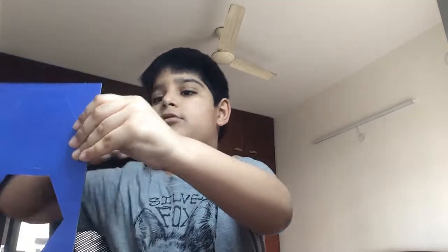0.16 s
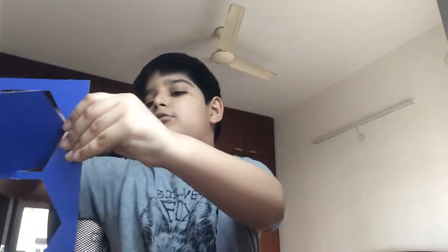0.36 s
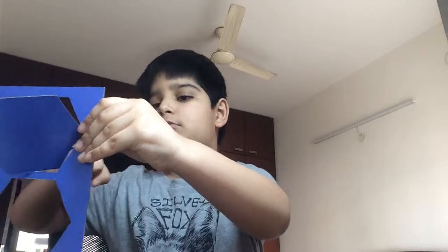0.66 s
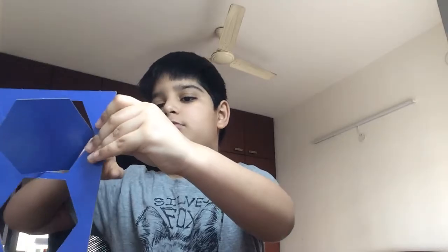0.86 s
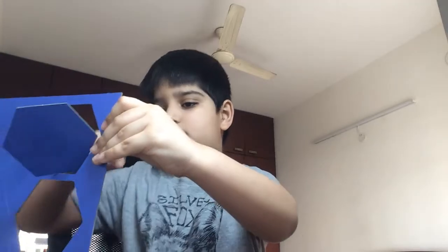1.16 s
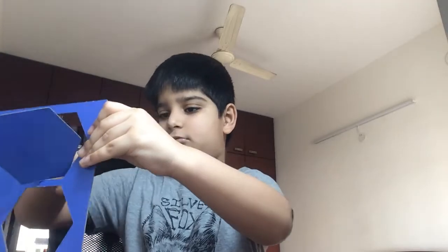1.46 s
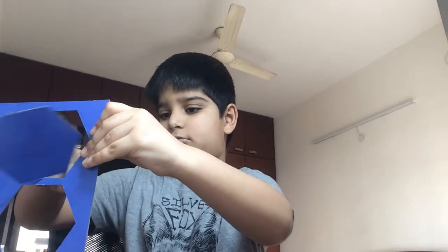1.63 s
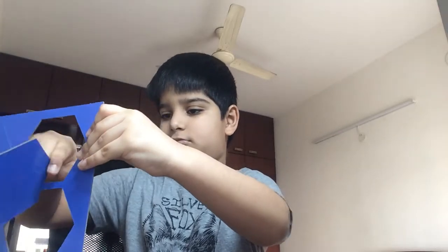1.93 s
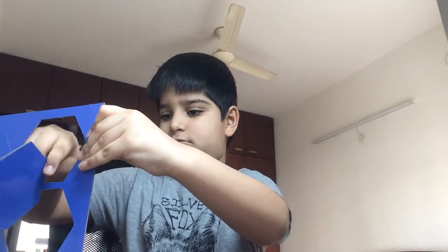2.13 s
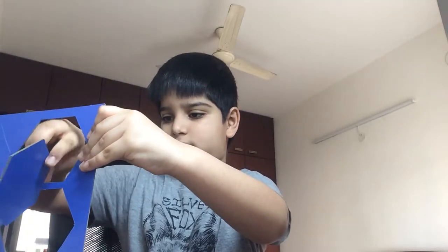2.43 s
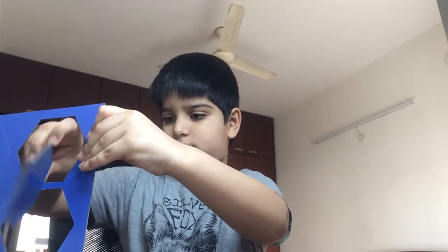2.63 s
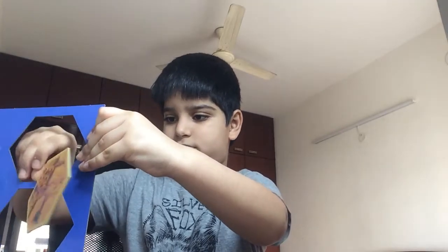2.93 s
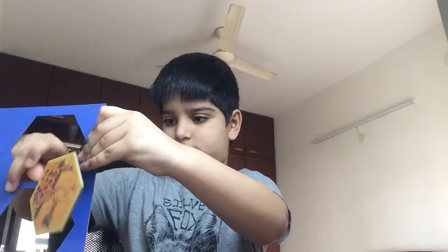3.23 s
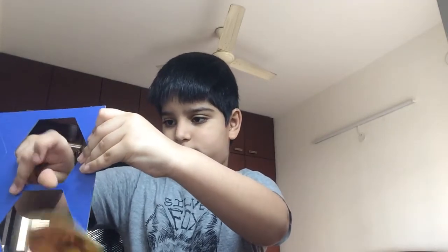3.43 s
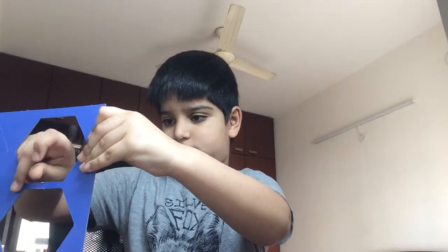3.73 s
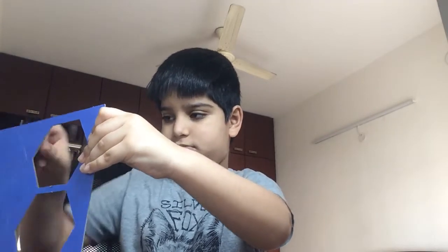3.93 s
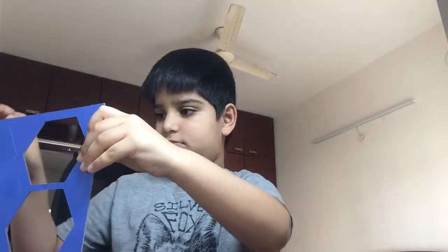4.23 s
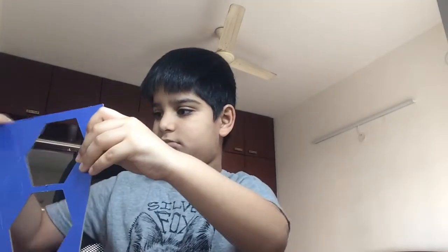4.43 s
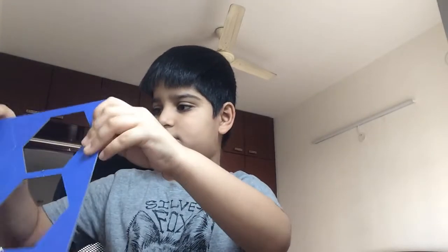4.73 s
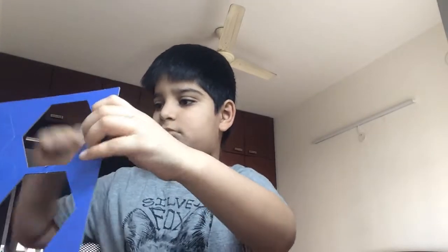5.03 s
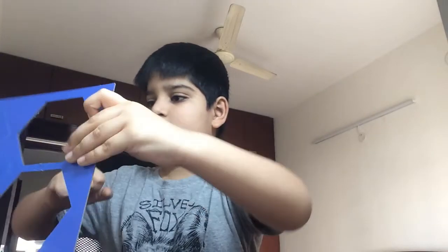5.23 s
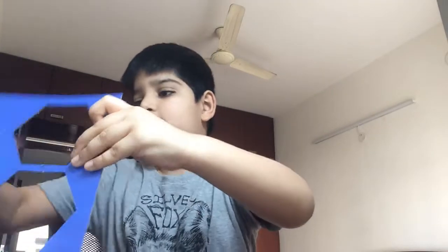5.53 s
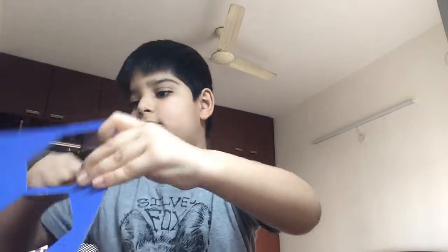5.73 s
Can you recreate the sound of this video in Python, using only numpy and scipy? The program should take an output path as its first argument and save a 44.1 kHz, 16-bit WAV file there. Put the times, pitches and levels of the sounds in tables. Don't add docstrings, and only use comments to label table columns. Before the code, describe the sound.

Irregular bursts of snapping, tearing cardboard with dull thunks and quiet handling between them, over faint low street rumble indoors.

```python
import sys
import numpy as np
from scipy import signal
from scipy.fft import rfft, irfft, next_fast_len
from scipy.io import wavfile
from scipy.ndimage import map_coordinates

SR = 44100
rng = np.random.default_rng(int(sys.argv[2]) if len(sys.argv) > 2 else 0)


def to_wav(s):
    ch = np.atleast_2d(s).T
    pcm = np.round(np.clip(ch, -1, 1) * 32767)
    wavfile.write(sys.argv[1], SR, pcm.astype(np.int16))


def voltage_ratio(level):
    return 10 ** (np.asarray(level, float) / 20)


N = 258867

# start in seconds, crackle peak in dB, sharp edge in dB relative
# to it, tap peak in dB, tap frequency in Hz.
GRIP_SHIFTS = [(0.8215, -53, -30, -63, 258), (0.8845, -54.5, -19, -48.5, 259), (1.0029, -64, -12, -49, 255),
               (1.6887, -59, -17, -64, 300), (1.8494, -59, -6, -67, 300), (2.0194, -66, -12, -62, 242),
               (2.077, -63, -24, -36, 340), (2.142, -62, -25, -50, 314), (2.2969, -59, -21, -47, 400),
               (2.5034, -56.5, -20, -55.5, 440), (2.8085, -60.5, -23, -50.5, 418),
               (2.8918, -47, -28, -48, 500), (2.9991, -59, -15, -62, 332), (3.988, -50, -10, -55, 240),
               (4.032, -65, -10, -39, 380), (4.2367, -57, -12, -34.5, 350), (4.4823, -65, -11, -44, 303),
               (4.585, -54, -9, -46.5, 324), (4.6239, -60, -17, -66, 330), (4.8623, -58.5, -7, -51, 526),
               (5.1944, -49.5, -13, -47, 549), (5.2354, -56, -7, -51, 244)]
# frequency in Hz, level in dB per Hz.
RUMBLE_SPECTRUM = [(15, -59), (25, -45), (47, -4.5), (97, -2.5), (150, -4.5), (171, -9), (194, -1),
                   (260, -13), (340, -54.5), (570, -120)]
# frequency in Hz, level in dB per Hz.
TRAFFIC_SPECTRUM = [(140, -14.5), (240, -7.5), (339, -3.5), (529, -7.5), (764, -10.5), (954, -21),
                    (1500, -33.5), (1950, -21.5), (3300, -120)]


def snaps():
    # start in seconds, crackle peak in dB, bend and sharp edge in dB relative
    # to it, decay time T60 in seconds.
    tabs = [(0.386, -23, 2.5, -7.5, 0.1), (0.3945, -24, -14, -10, 0.099), (0.4358, -28, 2.5, -25, 0.06),
            (0.508, -31, 2, -16, 0.048), (1.095, -39, 4, -10.5, 0.15), (1.1561, -50, -7, -19, 0.073),
            (1.558, -47, 2, -8.5, 0.11), (1.5831, -43.5, 6, -20, 0.053), (3.4418, -24, -7, -14.5, 0.039),
            (3.479, -31, -3, -14, 0.066), (3.5482, -22, 0, -24, 0.056), (3.6547, -16.5, -9, -17, 0.084),
            (3.7116, -19.5, -14, -13, 0.058), (3.7421, -27.5, -6, -20, 0.035),
            (3.7794, -24, -12, -11, 0.092), (3.8294, -40, -2, -15, 0.06), (4.2215, -45, 1, -4.5, 0.035),
            (4.3312, -42.5, -1, -25, 0.051), (5.6005, -21, -5, -12.5, 0.073), (5.6699, -47, -10, -4, 0.045),
            (5.6985, -27.5, -6, -9, 0.078), (5.8387, -30, -12, -14, 0.078)]
    # frequency in Hz, width in Hz, level in dB.
    board_modes = [(640, 160, -0.5), (837, 145, 3.5), (1032, 175, 0.5), (1245, 172, 2.5), (1670, 270, -4.5)]
    # frequency in Hz, width in Hz, level in
    # dB.
    upper_board_modes = [(1900, 470, 3.2), (2320, 300, 3), (2690, 280, 3), (3245, 320, 0), (3740, 300, 0),
                         (4400, 700, -3.5)]
    # frequency in Hz, level in dB per Hz.
    edge_spectrum = [(2650, -34.5), (4500, 0.5), (4940, 0.5), (5720, -1), (9000, -14.5), (11700, -42.5),
                     (19800, -120)]
    # frequency in Hz, level in dB per Hz.
    air_spectrum = [(6000, -27.5), (9000, 1.5), (12000, -5.5), (15500, -13)]

    tears = []
    for s, db, bend_db, edge_db, t60 in tabs:
        air_db = -12 + 0.75 * bend_db + edge_db
        tears.append((s, db, bend_db, edge_db, air_db, t60))
    for s, db, edge_db, tap_db, _ in GRIP_SHIFTS:
        bend_db = -0.3 + 0.25 * (tap_db - db)
        tears.append((s, db, bend_db, edge_db, -25, 0.06))

    body, edge, air = np.zeros((3, N))
    t = np.arange(8192) / SR
    clumps = np.pad(voltage_ratio(0.99 * wobble(500)), (0, len(t)), "edge")
    for s, db, bend_db, edge_db, air_db, t60 in tears:
        decay = voltage_ratio(-60 * t / max(t60, 0.01)) + 0.34 * voltage_ratio(-60 * t / 0.0048)
        burst = voltage_ratio(db) * decay * (1 - np.exp(-t / 0.0006))
        spikes = burst * rng.standard_normal((3, len(t))) * voltage_ratio(2.85 * rng.standard_normal(len(t)))
        spikes[1:] *= clumps[round(s * SR):][:len(t)]
        grip = 1 + 0.025 * rng.standard_normal(2)
        add(body, s, voltage_ratio(bend_db + 9.2) * resonant(spikes[0], board_modes, grip[0])
            + voltage_ratio(1.5) * resonant(spikes[1], upper_board_modes, grip[1]))
        add(edge, s, voltage_ratio(edge_db + 5.5) * spikes[2])
        add(air, s, voltage_ratio(air_db + 4.0) * spikes[2])
    edge = filtered(edge, lambda hz: voltage_ratio(along(edge_spectrum, hz)))
    air = filtered(air, lambda hz: voltage_ratio(along(air_spectrum, hz)))
    return body + edge + air


def knocks():
    # start in seconds, peak in dB, frequency in Hz, decay time T60 in seconds.
    tile_knocks = [(0.384, -8.5, 375, 0.029), (0.396, -33, 433, 0.022), (0.444, -31.5, 407, 0.05),
                   (0.504, -33.5, 515, 0.028), (1.096, -31, 300, 0.08), (1.108, -22.5, 277, 0.027),
                   (1.158, -30, 260, 0.049), (1.558, -48.5, 302, 0.066), (1.582, -38, 595, 0.06),
                   (3.442, -37.5, 510, 0.11), (3.479, -30.5, 328, 0.087), (3.55, -16, 410.4, 0.062),
                   (3.564, -19, 393, 0.02), (3.658, -25.5, 474, 0.046), (3.712, -29, 636, 0.086),
                   (3.787, -27.5, 228, 0.08), (3.83, -35, 407, 0.04), (4.042, -35, 238, 0.035),
                   (5.5988, -13.5, 358, 0.045), (5.6995, -24, 401.6, 0.085), (5.84, -33, 492, 0.029)]
    # start in seconds, peak in dB, frequency in Hz, T60 in seconds.
    frame_slaps = [
        (0.437, -29.5, 773, 0.079),
        (0.506, -31.5, 542, 0.038),
        (1.102, -28.5, 654, 0.018),
        (1.124, -32, 640, 0.039),
        (1.583, -37.5, 569, 0.058),
        (3.55, -18.5, 1028, 0.045),
        (3.574, -23.5, 613, 0.052),
        (3.667, -21, 1085, 0.074),
        (4.221, -44.5, 1236, 0.04),
        (5.6006, -28, 1270, 0.026),
    ]
    taps = [(s - 0.001, db, hz, 0.058) for s, _, _, db, hz in GRIP_SHIFTS]
    wide_modes, close_modes = [1.42, 0.72, 1.9], [1.17, 0.8, 0.62]
    out, t = np.zeros(N), np.arange(SR // 4) / SR
    for table, spread in (tile_knocks + taps, wide_modes), (frame_slaps, close_modes):
        for s, db, hz, t60 in table:
            ratios = np.r_[1, spread * (1 + 0.07 * rng.standard_normal(3))]
            since = t - 1 / hz - 0.002
            wander = np.cumsum(rng.standard_normal((4, len(t))), axis=1) * 0.035 * (since > 0)
            swing = np.cos(2 * np.pi * hz * ratios[:, None] * since + wander)
            ring = -voltage_ratio([3.5, -7.5, -3.0, -8.5]) @ swing
            shape_db = np.where(since < 0, since * hz * 9, -60 * since / np.clip(t60, 0.02, 0.085))
            add(out, s - 0.0008, voltage_ratio(db - 6 + shape_db) * np.minimum(t / 0.0032, 1) * ring)
    return filtered(out, lambda hz: 1 / (1 + 1j * hz / 5500) ** 2)


def pings():
    # start in seconds, peak in dB, frequency in Hz.
    modes = [(.386, -33, 4306), (.395, -24, 818), (.396, -37, 4274), (.4355, -32, 1291), (.4355, -37, 1991),
             (.4355, -42, 2293), (.508, -37, 1291), (.508, -42, 2293), (.508, -48, 2702),
             (.8215, -60, 1722), (.8215, -62, 1270), (.8845, -59, 1690), (.8845, -55, 721),
             (1.004, -66, 1750), (1.096, -38, 800), (1.104, -42, 1604), (1.104, -44, 1250),
             (1.104, -49, 2024), (1.156, -55, 1539), (1.558, -47, 882), (1.558, -60, 4360),
             (1.583, -45, 1216), (1.583, -49, 1539), (2.077, -57, 818), (2.48, -52, 450),
             (2.503, -67, 2702), (2.892, -58, 1808), (3.4415, -40, 2713), (3.4415, -42, 3736),
             (3.4415, -40, 947), (3.479, -42, 3068), (3.479, -44, 1711), (3.479, -45, 3520),
             (3.549, -31, 1916), (3.551, -24, 800), (3.655, -27, 3294), (3.655, -28, 4425),
             (3.655, -31, 2670), (3.655, -31, 3940), (3.667, -31, 1496), (3.712, -34, 3714),
             (3.712, -35, 2347), (3.712, -33, 1216), (3.742, -42, 2325), (3.742, -46, 3789),
             (3.78, -33, 1808), (3.78, -39, 2691), (3.78, -44, 4489), (4.262, -44, 250), (4.331, -53, 1765),
             (5.525, -53, 330), (5.595, -46, 3870), (5.6004, -17, 1270), (5.6004, -28, 2659),
             (5.6004, -31, 2357), (5.604, -34, 5060), (5.698, -40, 2282), (5.698, -44, 4651),
             (5.839, -40, 1162), (5.839, -44, 4155)]
    out, t = np.zeros(N), np.arange(SR // 16) / SR
    for s, db, hz in modes:
        t60 = 0.042 * (1000 / hz) ** 0.25
        envelope = voltage_ratio(db + 3 - 60 * t / t60) * (1 - np.exp(-t / 0.0012))
        add(out, s, envelope * np.sin(2 * np.pi * hz * t))
    return out


def flex():
    # start in seconds, peak in dB.
    long_pushes = [(0.384, -19), (0.4035, -21), (0.446, -17), (0.503, -31), (0.883, -46), (3.438, -39),
                   (0.823, -44), (1.097, -19), (1.169, -41), (1.556, -30), (2.076, -39.5), (2.815, -50),
                   (2.996, -45), (3.136, -44), (3.344, -41), (3.478, -20.5), (3.548, -17), (3.654, -18.5),
                   (3.714, -31), (3.786, -25.5), (4.013, -33), (4.484, -47), (4.572, -38.5), (4.859, -40),
                   (5.187, -47.5), (5.468, -45), (5.604, -23.5), (5.842, -40)]
    # start in seconds, peak in dB.
    cross_pushes = [(0.383, -13.5), (0.4075, -19), (0.507, -31), (0.571, -38), (1.586, -41), (2.3, -51),
                    (2.994, -44.5), (3.988, -34), (4.233, -40), (4.479, -43), (5.703, -25)]
    # start in seconds, level in dB, frequency in Hz, length in seconds.
    bows = [
        (1.04, -45, 255, .013),
        (1.054, -40, 285, .019),
        (1.18, -53, 250, .04),
        (1.45, -52, 268, .045),
        (3.945, -45, 115, .035),
        (4.025, -43, 215, .035),
        (3.22, -58, 240, .04),
        (.37, -42, 200, .01),
        (5.585, -42, 250, .01),
    ]
    pushes = [(s, db, 103.7 - 2.2 * s, 1) for s, db in long_pushes]
    pushes += [(s, db, 163, 0.85) for s, db in cross_pushes]
    out, t = np.zeros(N), np.arange(SR // 3) / SR
    for s, db, hz, shorter in pushes:
        t60 = (0.042 - 0.0018 * db) * shorter
        swing = np.sin(2 * np.pi * hz * t) + 0.26 * np.sin(2 * np.pi * 1.6 * hz * t)
        envelope = voltage_ratio(db + 2.7 - 60 * t / max(t60, 0.03)) * (1 - np.exp(-t / 0.0027))
        add(out, s + 0.0036, envelope * swing)
    for s, db, hz, length in bows:
        envelope = voltage_ratio(db) * np.exp(-(t / length - 1) ** 2 * 2.5)
        add(out, s, envelope * np.sin(2 * np.pi * hz * t * (1 + 0.6 * t)))
    return out


def rub():
    # start in seconds, hold in seconds, level in dB.
    slides = [
        (4.008, 0.027, -69.5),
        (4.63, 0.0021, -67),
        (5.15, 0.036, -61),
        (5.25, .01, -79),
        (5.398, .012, -63),
        (5.435, .01, -65),
    ]
    # start in seconds, hold in seconds, level in dB.
    slips = [
        (0.382, 0.002, -61),
        (3.439, 0.001, -58),
        (3.709, .002, -47),
        (3.653, 0.001, -50.5),
        (5.572, 0.003, -64),
        (5.595, 0.003, -56),
    ]
    # start in seconds, hold in seconds, level in dB.
    partings = [
        (1.122, 0.036, -53.5),
        (1.21, .04, -62),
        (1.6, .005, -59),
        (1.68, .01, -68),
        (3.79, 0.021, -35),
        (4.34, 0.04, -65),
        (5.62, .06, -52.5),
        (5.72, .01, -55),
        (5.78, .04, -64),
    ]
    # frequency in Hz, level in dB per Hz.
    skin_spectrum = [(1180, -36.5), (2000, -5), (2670, -1.5), (2930, -4.5), (3940, -1), (6200, -15),
                     (6820, -8), (9090, -13.5), (16000, -23.5)]
    # frequency in Hz, level in dB per Hz.
    cut_spectrum = [(290, -32), (500, -2.5), (2500, -7.5), (3290, -9.5), (3700, -8), (5470, -16.5),
                    (16000, -49)]

    band_knots = [np.arange(SR // 2 + 1) / 300]
    bands = voltage_ratio(3.9 * map_coordinates(rng.standard_normal(80), band_knots))
    squeaky = filtered(noise(skin_spectrum), lambda hz: bands[hz.astype(int)])
    pressure = swells(slides, attack_s=0.012, release_s=0.031) + swells(slips, attack_s=0.012, release_s=0.002)
    skin = pressure * unit(voltage_ratio(2.0 * wobble(320) + 2.4 * wobble(40)) * squeaky)
    grains = unit(voltage_ratio(1.6 * wobble(400) + 0.7 * wobble(40)) * noise(cut_spectrum))
    edges = swells(partings, attack_s=0.0076, release_s=0.059) * grains
    return voltage_ratio(1.5) * skin + voltage_ratio(-2.0) * edges


def shudder():
    # time in seconds, deep level in dB, middle level in dB.
    shakes = [
        (.46, -35.5, -41),
        (1.13, -43, -54),
        (3.68, -37, -33),
        (5.44, -70, -58),
        (5.76, -45, -64),
        (5.86, -61, -50),
    ]
    deep = swells([(s, 0, db) for s, db, _ in shakes], attack_s=0.095, release_s=0.13)
    mid = swells([(s, 0, db) for s, _, db in shakes], attack_s=0.088, release_s=0.099)
    return deep * noise(RUMBLE_SPECTRUM) + mid * noise(TRAFFIC_SPECTRUM)


def room(x):
    # frequency in Hz, decay time T60 in seconds.
    decay = [(100, 0.34), (400, 0.3), (1500, 0.31), (5000, 0.36), (12000, 0.44)]
    out, step = np.zeros(N), SR // 3
    for start in range(0, N, step):
        hz, t, z = signal.stft(rng.standard_normal(SR // 2), SR, nperseg=256)
        tail = signal.istft(z * voltage_ratio(-60 * t / along(decay, hz)[:, None]), SR, nperseg=256)[1]
        echo = signal.fftconvolve(x[start:start + step], tail / np.linalg.norm(tail))
        add(out, start / SR + 0.004, echo)
    return out


def door():
    # start in seconds, hold in seconds, level in dB.
    shuts = [
        (5.319, .045, -36.5),
        (5.428, .015, -48),
        (5.462, .005, -54),
    ]
    # frequency in Hz, level in dB per Hz.
    door_spectrum = [(88, -61), (150, -37), (243, -7.5), (352, -0.5), (496, -12.5), (576, -7.5),
                     (699, -24.5), (802, -13.5), (1010, -18), (4000, -47), (5200, -72), (8800, -120)]
    echo = unit(voltage_ratio(1.2 * wobble(90)) * noise(door_spectrum))
    panel = voltage_ratio(-6) * fuzzy(325, width_hz=45)
    return swells(shuts, attack_s=0.016, release_s=0.095) * unit(echo + panel)


def street():
    # time in seconds, rumble level in dB.
    loudness = [
        (0.0, -57.5),
        (0.75, -64),
        (1.2, -58),
        (1.9, -59.5),
        (2.45, -64),
        (3.2, -60),
        (4.1, -58.5),
        (5.2, -62.5),
        (5.87, -63),
    ]
    # start in seconds, hold in seconds, level in dB.
    engine_swells = [(.1, .2, -57.5), (.72, .02, -46.5), (1.4, 0.018, -52), (1.52, .05, -51),
                     (1.85, 0.018, -54.5), (2.05, 0.14, -51), (2.31, .02, -53), (1.29, .01, -55),
                     (2.57, .02, -51), (3.0, .02, -58), (4.6, .02, -56), (4.86, 0.017, -56.5)]
    # multiple of the fundamental, level in dB.
    horn_partials = [(7, -9), (8, 2), (9, 5), (10, 0), (11, -13)]
    # start in seconds, end in seconds, frequency in Hz, level in dB.
    thin_whines = [
        (0, .35, 7480, -89),
        (.62, 1.1, 7470, -89),
        (1.1, 1.6, 7480, -90),
        (1.6, 2.5, 7450, -91),
        (0, 1.5, 9610, -92),
        (.66, .8, 3130, -86),
        (1.9, 2.5, 3130, -88),
        (.78, 1.03, 3130, -81),
        (3.38, 3.56, 2820, -72),
        (3.33, 3.45, 3200, -77),
    ]
    level_db = curve(loudness)
    rumble = voltage_ratio(level_db + 1.0) * unit(voltage_ratio(2.3 * wobble(7.6)) * noise(RUMBLE_SPECTRUM))
    traffic = voltage_ratio(level_db - 4.5) * unit(voltage_ratio(0.5 * wobble(11)) * noise(TRAFFIC_SPECTRUM))
    engine = voltage_ratio(-4.5) * swells(engine_swells, attack_s=0.11, release_s=0.17) * fuzzy(154, width_hz=27)

    blast = swells([(1.33, 0.25, -73.5)], attack_s=0.09, release_s=0.33)
    horn_hz = 398
    chord = sum(voltage_ratio(db) * fuzzy(k * horn_hz, width_hz=115) for k, db in horn_partials)
    horn = blast * voltage_ratio(2.8 * wobble(45)) * chord

    t, whines = np.arange(N) / SR, np.zeros(N)
    for start, end, hz, db in thin_whines:
        fade = np.clip(np.minimum(t - start, end - t) / 0.03, 0, 1)
        whines += fade * voltage_ratio(db + 3 * wobble(20)) * fuzzy(hz, width_hz=45)
    return rumble + traffic + engine + horn + whines


def resonant(x, modes, stretch):
    f = np.fft.rfftfreq(len(x), 1 / SR) / stretch
    response = 0
    for k, (centre, width, db) in enumerate(modes):
        mode = 1j * f * width / (centre * centre - f * f + 1j * f * width)
        response = response + (-1) ** k * voltage_ratio(db) * mode
    return irfft(rfft(x) / (1 + 1j * f / 9000) ** 2 * response, len(x))


def fuzzy(hz, width_hz):
    return unit(filtered(rng.standard_normal(N), lambda f: 1 / (1 + (2 * (f - hz) / width_hz) ** 2)))


def noise(spectrum):
    return unit(filtered(rng.standard_normal(N), lambda hz: voltage_ratio(along(spectrum, hz))))


def filtered(x, response):
    m = next_fast_len(N + SR // 2)
    return irfft(rfft(x, m) * response(np.fft.rfftfreq(m, 1 / SR)), m)[:N]


def swells(rows, attack_s, release_s):
    t = np.arange(0, N + 20, 20) / SR
    gain = np.zeros(len(t))
    for s, hold, db in rows:
        away = np.maximum((s - t) / attack_s, (t - s - hold) / release_s)
        gain += voltage_ratio(db - 20 * np.maximum(away, 0))
    return np.interp(np.arange(N) / SR, t, gain)


def wobble(rate):
    return map_coordinates(rng.standard_normal(int(N * rate / SR) + 4), [np.arange(N) * rate / SR])


def curve(rows):
    s, db = np.transpose(rows)
    return np.interp(np.arange(N) / SR, s, db, left=-150, right=-150)


def along(points, hz):
    f, v = np.transpose(points)
    return np.interp(np.log(hz + 1), np.log(f + 1), v)


def unit(x):
    return x / np.sqrt(np.mean(x ** 2) + 1e-20)


def add(track, s, sound):
    part = track[round(s * SR):][:len(sound)]
    part += sound[:len(part)]


def scene():
    hits, body, rings, swings, sliding = snaps(), knocks(), pings(), flex(), rub()
    direct = hits + body + rings + swings + sliding
    sent = voltage_ratio(-9.5) * hits + voltage_ratio(-5) * body + voltage_ratio(-15) * rings + voltage_ratio(-10.0) * swings + voltage_ratio(-13.0) * sliding
    return (direct + room(sent) + shudder() + door() + street())[None]


def roll_off(x):
    return signal.sosfilt(signal.butter(12, 16330, fs=SR, output="sos"), x)


def record(dry):
    # frequency in Hz, level in dB per Hz.
    hiss_spectrum = [(530, -38.5), (900, -7.5), (1120, -1.5), (1420, -6), (3200, -10.5), (6380, -16.5),
                     (9280, -17), (15000, -25), (15500, -60)]
    bass_cut = signal.butter(2, 55, "high", fs=SR, output="sos")
    top_cut = signal.butter(24, 15800, fs=SR, output="sos")
    heard = signal.sosfilt(top_cut, signal.sosfilt(bass_cut, dry))
    return roll_off(heard + voltage_ratio(-73) * noise(hiss_spectrum))


dry = scene()
out = record(dry)
to_wav(out)
```